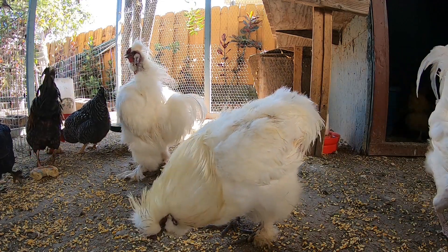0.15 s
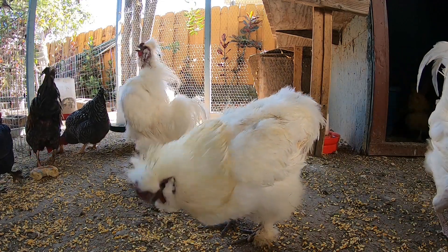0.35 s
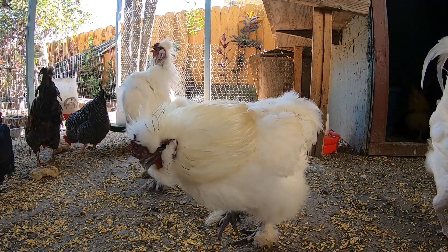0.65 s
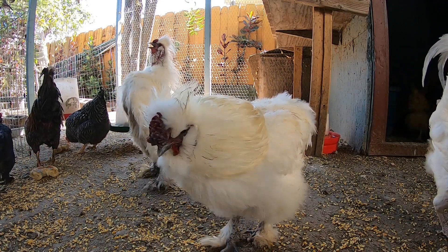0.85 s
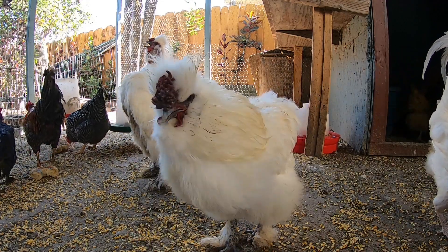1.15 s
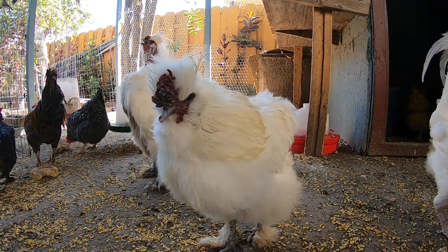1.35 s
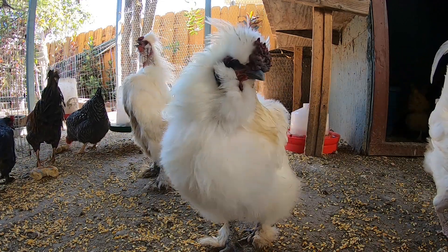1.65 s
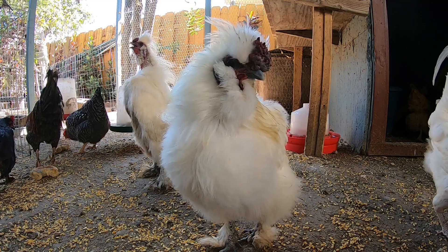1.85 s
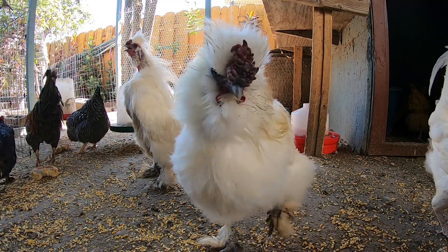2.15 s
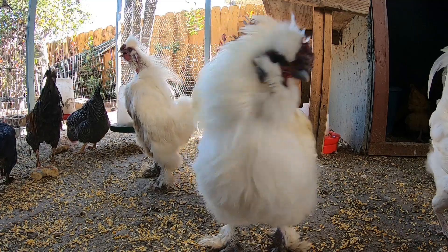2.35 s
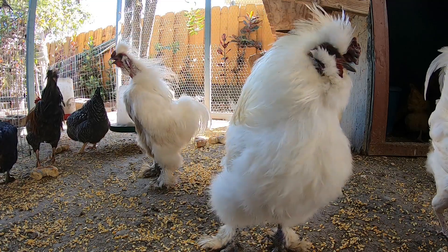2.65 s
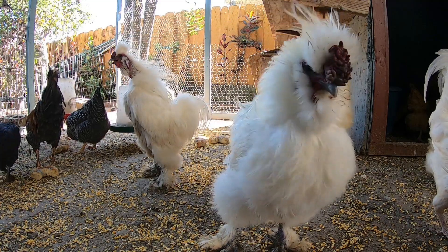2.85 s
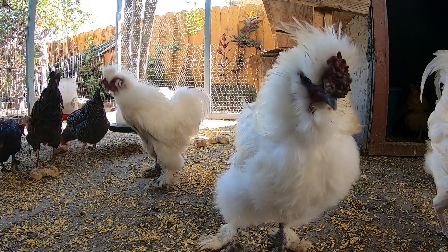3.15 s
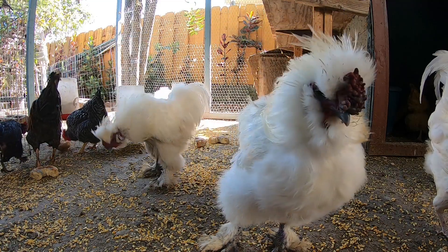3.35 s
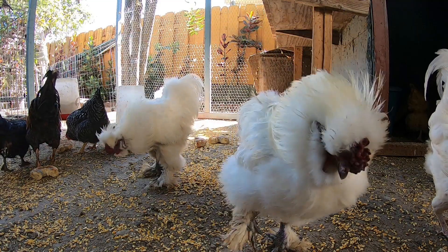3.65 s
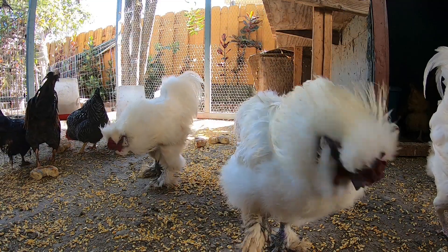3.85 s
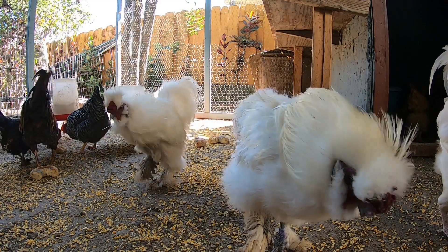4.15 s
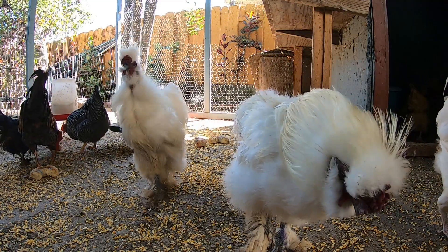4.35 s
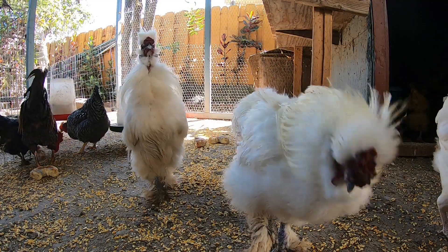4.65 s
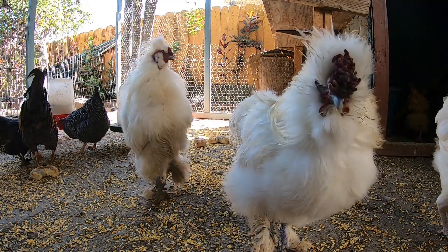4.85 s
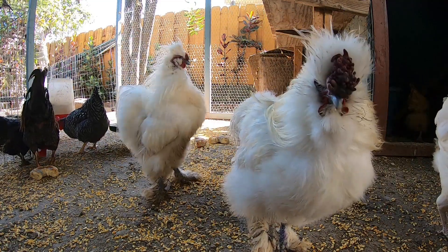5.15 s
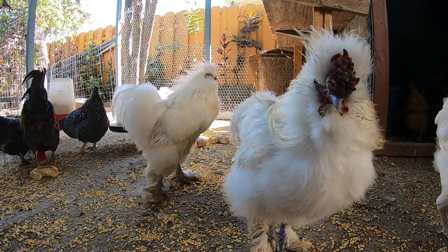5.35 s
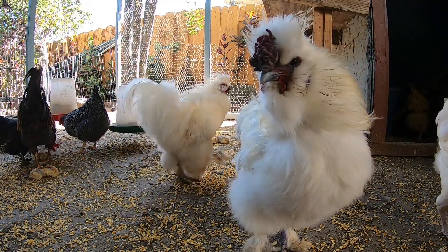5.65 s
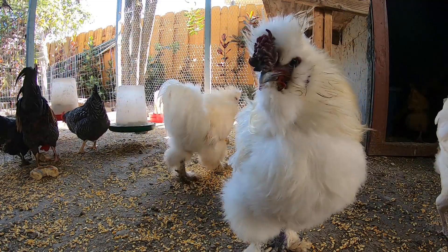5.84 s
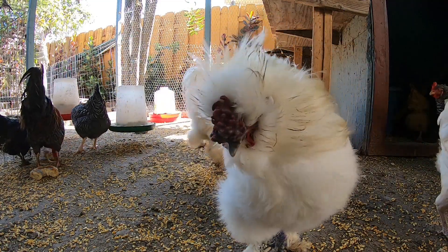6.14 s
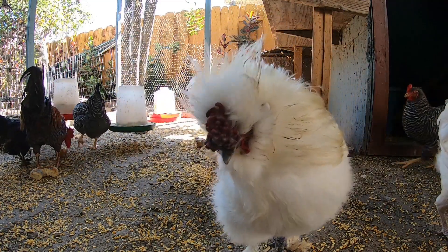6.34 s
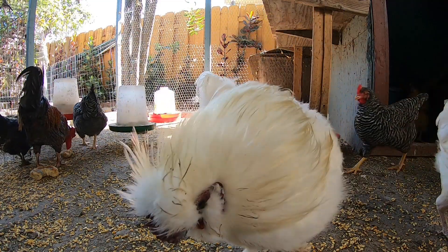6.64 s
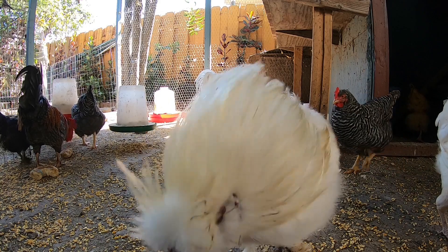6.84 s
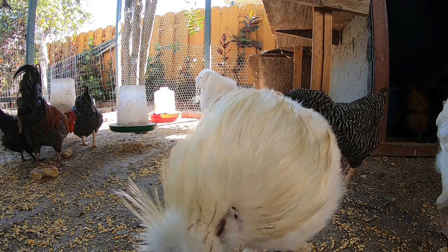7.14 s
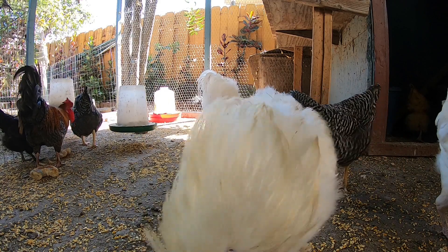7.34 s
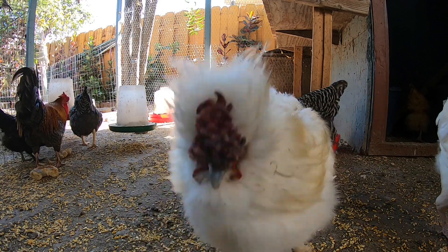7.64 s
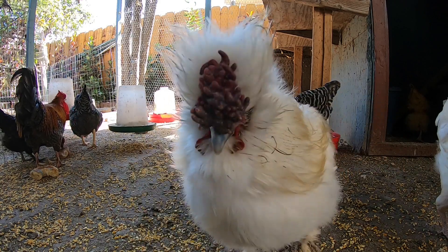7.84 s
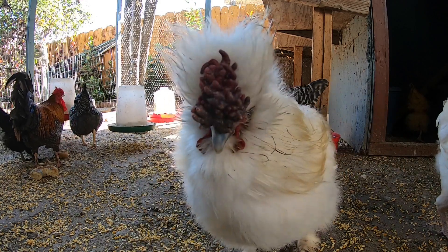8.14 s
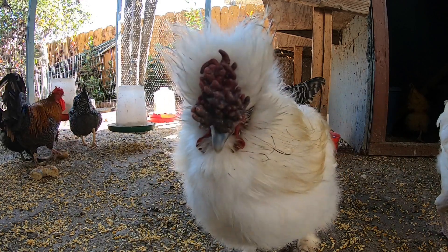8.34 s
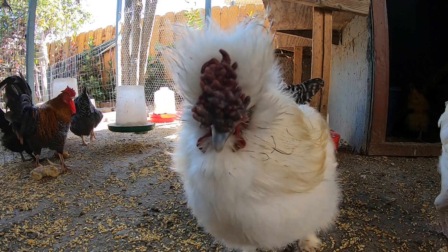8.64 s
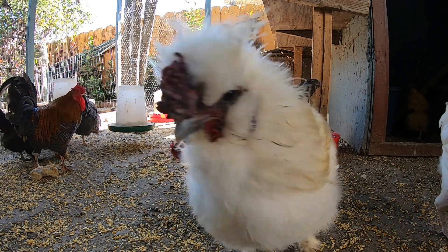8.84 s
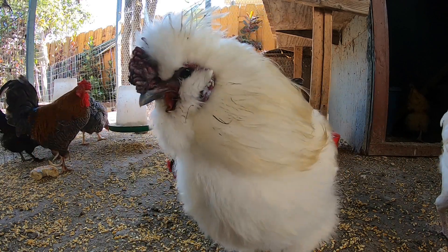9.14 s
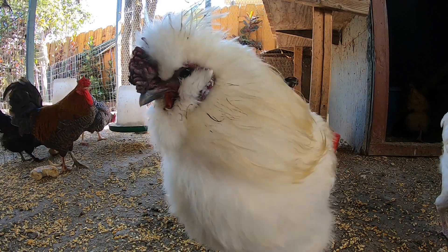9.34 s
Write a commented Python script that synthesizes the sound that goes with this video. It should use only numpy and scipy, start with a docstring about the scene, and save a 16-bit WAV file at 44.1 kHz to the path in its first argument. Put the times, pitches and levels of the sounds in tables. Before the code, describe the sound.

A rooster left of a nearby microphone barks roughly, then crows loudly once, breaking between clear tone and harsh rasp before collapsing into a hoarse low ending. Hens croon before and beneath it. Then much quieter: throaty grumbles, scattered short clucks, distant sliding bird whistles, tiny grain pecks on the right, litter rustles and soft trotting thuds over uneven low outdoor rumble. A sudden squawk begins as it ends.

```python
"""Hens croon softly over a low outdoor rumble; then a rooster on the left barks hoarsely and crows once. His
voice is built from pulses, rough noise and ringing beak tones, and breaks between clear and raspy. Hens grumble
(uneven pulses), cluck (short bursts of pulses), peck and scratch (shaped noise), a rooster runs past (dull
thuds), while a songbird whistles gliding notes, blurred by echoes. At the end the rooster starts to squawk."""
import sys
import numpy as np
from scipy import signal
from scipy.fft import rfft, irfft
from scipy.io import wavfile
from scipy.ndimage import uniform_filter1d

SR = 44100
rng = np.random.default_rng(int(sys.argv[2]) if len(sys.argv) > 2 else 0)


def int16_out(signal):
    """Quantize to a 16-bit WAV file."""
    q = np.round(np.clip(np.atleast_2d(signal).T, -1, 1) * 32767)
    wavfile.write(sys.argv[1], SR, q.astype(np.int16))


N = 418509
TIME = np.arange(N) / SR
CUTOFF_HZ = 15100   # top of the sound

# Levels in the tables are starting levels: mixing, chance and filters may still shift them.
# The rooster's voice organ in each of three calls: t/s, f/Hz, roughness/0-1
BARK = [(0.439, 801, 0.66), (0.634, 738, 1)]
CROW = [(.754, 793.8, 0.77), (0.786, 1075, 0), (0.842, 1074, 0.032), (.875, 851.8, 0.75),
        (.93, 830.9, 0.91), (.96, 837, 0.048), (1.0, 922.2, 0.67), (1.041, 930.6, 0.76),
        (1.075, 1015, 0.45), (1.16, 1075, 0), (1.308, 1038, 0.313), (1.33, 870.4, 0.62), (1.43, 836.7, 0.6),
        (1.58, 829.2, 0.5), (1.7, 915.4, 0.84), (1.93, 929, 0.57), (2.02, 921.2, 0.4), (2.2, 906.7, 0.3),
        (2.3, 906.2, 0.36), (2.365, 884.7, 0.74), (2.431, 878.2, 0.21), (2.475, 829.4, 0.49),
        (2.5, 735, 0.75), (2.601, 715.3, 0.94), (2.77, 713.3, 0.8), (2.817, 635.2, 0.97),
        (2.837, 605.7, 0.61), (2.859, 610.7, 0.58), (2.893, 569, 0.89)]
SQUAWK = [(9.456, 1208, 0.067), (9.469, 1012, 0.19), (9.469, 644, 0.26), (9.492, 775, 0.032)]
# Strain makes the voice trill and every second pulse weaken; the end values hold: t/s, strain/0-1
STRAIN = [(1.04, 0.1), (1.12, 0.86), (1.3, 0.77), (1.34, 0.42)]
# How each call is blown: throat level/dB, open-beak level/dB, attack/s, hold/s, release/(dB per s)
BLOWING = [(-25, -23.5, 0.00088, 0.086, 185), (-25, -23, 0.00059, 2.103, 291),
           (-24.5, -34.5, 0.01, .05, 250)]
# The beak gapes wider through the crow, then the neck slackens for the last syllable:
# t/s, sizzle level against the beak/dB, gape/0-1, slack/0-1, level above about 3 kHz/dB
NECK = [(.44, -26.5, 0.3, 0.03, 0.5), (.75, -22.5, 0, 0.02, 1), (1.25, -30, 0.15, 0.04, -1),
        (1.55, -24, 0.65, 0.01, -1), (2.0, -27, 1, 0, -2), (2.22, -29.5, 1, 0, -3),
        (2.43, -26.5, .8, 0.04, -2), (2.47, -31, .8, .1, -10), (2.505, -22, 0.9, 0.85, -2),
        (2.65, -20.5, 0.9, .95, -6), (2.77, -18, 0.84, 0.95, -19), (2.81, -17, 0.5, 0.94, -3.5),
        (2.845, -17.5, 0.95, 0.95, 9.5), (2.9, -11, 0.7, 1, -4), (9.45, -27, 0.99, 0.94, 5.5)]
# The rooster's throat for clear tone, rasp, slack neck and final squawk: f/Hz, relative level/dB
CLEAR_THROAT = [(350, -30.5), (650, -8), (900, 4), (1100, -0.5), (1450, 3.5), (1800, 7.5), (2130, 6.5),
                (2400, -14), (2750, 5.5), (3200, -19), (3700, 1.5), (4300, -15.5), (4800, -36.5),
                (14000, -89)]
RASP_THROAT = [(300, -28.5), (480, -17), (590, -36.5), (800, 6), (1080, -0.5), (1350, -3.5), (1650, 10),
               (2030, 3.5), (2400, -1.5), (2780, -11.5), (3000, -1), (3250, -9.5), (3500, -23.5),
               (3780, -2.5), (4050, -25), (4400, -8), (4850, -35.5), (5600, -50.5), (14000, -68)]
SLACK_THROAT = [(300, -33), (700, -1), (1000, -1), (1300, -6), (1600, -1), (1850, 6), (2100, 4.5),
                (2500, 5.5), (2750, -1.5), (3000, -18.5), (3300, -12.5), (3650, 2), (4100, -24.5),
                (4700, -52), (5200, -28.5), (5500, -31.5), (6300, -25.5), (7500, -21), (14000, -90.5)]
SQUAWK_THROAT = [(300, -19.5), (620, 0.5), (1050, -6.5), (1450, 6), (2100, 6.5), (2700, -9), (3200, -17.5),
                 (3700, -29), (4300, -20), (5300, -36), (6500, -21), (14000, -61)]
# High resonances that glide as the beak gapes and the neck slackens:
# narrow f/Hz, wide f/Hz, slack f/Hz, narrow level/dB, wide level/dB, slack level/dB, sharpness Q
BEAK_MODES = [(5350, 5150, 5350, 3.5, -4.5, -6, 12), (6280, 6860, 6300, -10, -3, 2, 7.8),
              (6980, 7780, 7400, -5, 2.5, -0.5, 10), (8240, 8860, 8850, -9.5, 3.5, -0.5, 12),
              (10100, 9900, 10000, -15.5, -4, -5, 8), (12850, 12000, 15000, -27.5, -21.5, -19, 4.9)]
# The second side of the voice organ tightens slowly: t/s, f/Hz
OTHER_SIDE = [(1.3, 662.6), (1.8, 668.8), (2.4, 705.3)]
# How much louder the rooster is in the left ear than the right: f/Hz, level difference/dB
ROOSTER_SIDE = [(380, -6.5), (780, 13), (1100, 3), (1500, 25), (2080, 0.5), (2750, 8), (3800, 3), (8000, 1)]
# Echoes from hard walls near the rooster: delay t/s, left gain, right gain
WALLS = [(.0011, 0.025, -0.3), (.0043, -0.083, -0.17), (.0097, -.08, .18)]
# Hens' drawn-out notes: t/s, length/s, start f/Hz, middle f/Hz, end f/Hz, level/dB,
# roughness/0-1, attack/s, release/s
CROONS = [(0, .17, 342.8, 362.2, 348.6, -31.5, 0.16, 0.075, 0.15),
          (.25, 0.15, 321.5, 354.5, 353, -35.5, 0.2, 0.036, 0.047),
          (.52, 0.16, 359.3, 368.4, 360.5, -39, .19, 0.02, 0.12),
          (.82, 0.16, 325.6, 344.3, 346, -41.5, 0, 0.098, 0.062)]
GRUMBLES = [(3.462, 0.041, 306, 311, 300, -49, 0.2, 0.022, .015),
            (3.515, 0.22, 267, 277.7, 262.6, -49.5, 0.68, 0.028, 0.01),
            (3.765, 0.18, 266.2, 275.5, 289, -47.5, 0.817, 0.056, 0.021),
            (3.91, 0.15, 283.6, 309, 321.6, -47.5, 0.28, 0.015, 0.022),
            (6.28, 0.19, 264.2, 277.4, 258, -48, 0.36, 0.0067, 0.02),
            (6.46, 0.23, 259.8, 301.3, 318.5, -47, 0.84, 0.0044, 0.03),
            (6.71, 0.105, 288, 270.2, 257, -54, .8, 0.011, 0.044),
            (8.28, 0.263, 234.8, 211.2, 230.7, -50.5, 0.99, 0.05, 0.057)]
# Tone colour of the hens' throats: f/Hz, relative level/dB
CROON_THROAT = [(200, -6), (360, -18.5), (720, -4.5), (1080, -4.5), (1430, -9.5), (1800, -20), (2400, -30),
                (3200, -20.5), (4400, -31), (5000, -39.5), (5700, -23.5), (6700, -43.5), (7800, -31),
                (12000, -65)]
GRUMBLE_THROAT = [(150, -9), (300, 2), (410, -1), (590, 7.5), (780, -2), (1080, -2), (1380, -8.5),
                  (1560, -5), (2200, -22), (4000, -29.5), (9000, -45)]
# A hen's mouth resonance rises as her beak opens: t/s, f/Hz
HEN_MOUTH = [(3.5, 1150), (3.6, 1030), (3.7, 1120), (3.79, 950), (4.05, 1320), (6.3, 1180), (6.5, 990),
             (6.68, 1400), (6.78, 850)]
# Clucks: t/s, length/s, pitch f/Hz, level/dB, brightness f/Hz
CLUCKS = [(3.338, 0.026, 270, -44.5, 1920), (4.29, 0.034, 323, -42.5, 704),
          (4.442, 0.045, 294, -42.5, 1660), (4.529, 0.052, 304, -43, 1140), (4.61, 0.083, 265, -51.5, 1080),
          (5.07, 0.043, 215, -47.5, 1340), (5.451, 0.023, 329, -42.5, 1550),
          (5.602, 0.04, 344.7, -36, 1270), (5.662, 0.025, 336.5, -39.5, 1370),
          (5.725, 0.06, 350, -38, 1400), (5.815, 0.019, 337, -34, 1250), (6.037, 0.029, 293, -41, 1100),
          (6.146, 0.02, 356, -41, 1770), (6.169, 0.038, 785, -45.5, 2370), (6.199, 0.037, 412, -46.5, 1890),
          (6.279, 0.043, 262.6, -39, 1120), (6.845, 0.024, 808, -42.5, 2070),
          (6.893, 0.046, 262, -42.5, 1220), (7.227, 0.028, 438.7, -29.5, 1140),
          (7.668, 0.033, 419.6, -35.5, 1190), (8.063, 0.027, 448, -33.5, 1970),
          (8.901, 0.029, 454, -31.5, 1950), (9.371, 0.03, 365.7, -34.5, 1380)]
# Tone colour of a cluck: f/Hz, relative level/dB
CLUCK_THROAT = [(120, -3), (330, 6.5), (600, 4.5), (900, 1), (1400, 1.5), (2200, 0), (3100, 6.5), (4500, 5),
                (6000, -5), (12000, -25)]
# Songbird syllables: t/s, length/s, pitch f/Hz, sweep/octaves,
# bow of both ends below a straight glide/octaves, level/dB
SONG = [(2.937, 0.079, 3964, -0.18, .17, -49), (3.145, 0.079, 4020, -0.22, 0.095, -46.5),
        (3.29, 0.039, 3550, 0.35, 0.032, -38), (3.419, 0.065, 3845, -0.35, 0.0062, -39),
        (3.465, 0.032, 4540, -0.21, .03, -51), (3.568, 0.073, 3930, -0.34, 0.12, -35.5),
        (3.721, 0.038, 3500, -0.21, 0.0076, -42.5), (3.747, 0.048, 4160, -0.29, -0.04, -43),
        (3.846, 0.067, 3580, -0.52, -0.049, -35), (3.923, 0.044, 3590, -0.45, 0, -37),
        (4.021, 0.079, 2755, -0.38, -0.023, -39), (4.154, 0.041, 2786, -0.56, 0.035, -35),
        (4.28, 0.048, 2730, -0.54, 0.027, -36), (4.395, 0.036, 3610, 0.22, 0.00075, -42),
        (4.429, 0.072, 3636, -0.63, 0.12, -33), (4.662, 0.051, 4295, 0.024, 0, -37.5),
        (4.699, 0.035, 4075, -0.39, .07, -34), (4.838, 0.062, 5340, -0.47, 0.15, -43.5),
        (4.954, 0.054, 4315, -0.48, 0.084, -39.5), (5.079, 0.105, 3354, 0.6, 0.113, -37.5),
        (5.295, 0.073, 5080, -0.58, 0.1, -46), (5.44, 0.056, 3880, -0.67, 0.12, -40),
        (5.575, 0.059, 3565, -0.54, 0.12, -44), (5.65, 0.06, 3040, -0.8, 0.11, -39),
        (5.795, 0.052, 3790, -0.038, 0.054, -36.5), (5.815, 0.016, 4500, 0.54, 0.1, -35),
        (5.89, 0.072, 3387, -0.8, .14, -37.5), (5.973, 0.069, 2996, -0.18, .03, -36),
        (6.145, 0.37, 3990, -0.2, 0.037, -66.5)]
# The song comes back from house and fence: delay t/s, gain
SONG_ECHOES = [(.016, 0.33), (.034, 0.22), (.062, .14)]
# A beak on grain: t/s, level/dB, ring f/Hz
PECKS = [(3.643, -46, 4280), (4.0894, -36.5, 2660), (5.439, -37.5, 4200), (6.284, -55, 4040),
         (7.136, -46, 1940), (7.714, -39, 2630), (8.579, -44, 2320), (9.149, -48, 1690)]
# A bird trots over packed earth: t/s, level/dB
FOOTFALLS = [(3.347, -41.5), (4.301, -38.5), (4.45, -35.5), (4.529, -32.5), (4.653, -34), (5.075, -32.5),
             (5.73, -29.5), (8.077, -32), (8.388, -29), (8.915, -35)]
# Tone colour of one footfall: f/Hz, relative level/dB
THUD = [(50, -6.5), (110, -8), (165, 19.5), (240, -2.5), (380, -2.5), (700, -37), (2000, -75)]
# Feet and feathers in the litter: t/s, level/dB
SCRATCH = [(3.0, -93), (3.69, -72.5), (4.12, -78.5), (5.3, -75), (6.27, -67.5), (6.64, -86), (7.26, -74.5),
           (9.4, -82.5)]
# A foot drags through the litter: t/s, length/s, level/dB
SCUFFS = [(3.224, 0.06, -70.5), (3.64, 0.025, -68), (3.718, 0.058, -76), (6.042, 0.13, -63.5),
          (7.276, 0.22, -80.5), (8.33, 0.22, -80)]
# Tone colour of the litter: f/Hz, relative level/dB
LITTER = [(300, -7.5), (900, 4), (2500, -2), (4200, -6.5), (5500, -11.5), (8500, -8.5), (10500, -23.5),
          (12000, -29.5), (15000, -35.5)]
# Outdoor rumble over time: t/s, deep level/dB, low level/dB
RUMBLE = [(0.0, -48, -53), (0.5, -48.5, -55), (1.32, -62, -65), (3.67, -52.5, -54.5), (4.28, -67, -55),
          (4.68, -46.5, -45), (4.84, -57, -55), (5.05, -45, -48.5), (6.84, -56, -52), (8.38, -46, -41.5),
          (9.49, -50.5, -50)]
# Tone colour of deep rumble, low rumble and air: f/Hz, relative level/dB
DEEP_COLOUR = [(12, -23.5), (30, -12.5), (55, 1.5), (100, -5.0), (150, -35.0), (400, -67.5)]
LOW_COLOUR = [(60, -27.5), (120, 3.5), (180, 3.0), (260, -9.0), (450, -14), (1500, -60.5)]
AIR = [(120, -17), (300, -3), (800, -6.5), (1600, -15), (2500, -27), (4200, -26.5), (5500, -25),
       (9000, -25.5), (12000, -44)]

# The rooster's breath: the first push is the hardest, then throat and beak drift apart
ACCENT_DB, ACCENT_S = 2.5, 0.095
THROAT_SAG_DB_PER_S, BEAK_SAG_DB_PER_S = 1, -0.13   # the negative sag is a slight rise
MIDDLE_HZ, BEAK_DB_PER_OCTAVE = 940, 11   # higher notes are brighter
SLACK_THROAT_DB = 1.5   # a slack neck lets the low tones out
# A rough voice cannot hold its pitch or brightness (sizes at full roughness)
WAVER, WAVER_PER_S = 0.0119, 20   # share of the pitch, changes per s
FLUTTER_DB, FLUTTER_PER_S = 1, 28
# A half-rough voice keeps catching and breaking
BREAKING, BREAKS_PER_S = 0.19, 55   # swing of the roughness, changes per s
DOUBLING = 0.88   # typical weakening of every second pulse at full roughness, as a share
SHIMMER_DB, SHIMMER_PER_S = 3, 55   # each partial swells and fades on its own
SLACK_LAG, SLACK_WAVER = .06, 0.0251   # slack neck: second side lower and unsteadier, shares of pitch
# The head never holds still: share of each resonance, its level, changes per s
BEAK_WANDER, BEAK_WANDER_DB, BEAK_WANDER_PER_S = 0.0059, 3, 5.97
MOUTH_WANDER, MOUTH_WANDER_PER_S = 0.04, 20   # a hen's mouth: share, changes per s
# A cluck's mouth resonance peaks at this share of the brightness, from so far below
CLUCK_MOUTH_SHARE, CLUCK_MOUTH_OCTAVES = 0.72, 1
YARD_T60_S = 0.32   # time for the tail of the yard's echo to fall by 60 dB
HUM_HZ, HUM_MAX_DB, AIR_DB = 171, -53, -63


def rooster():
    """Three calls, heard more on the left, with wall echoes and the sound of the yard."""
    out = np.zeros(N)
    slack_throats = (SLACK_THROAT, SLACK_THROAT, SQUAWK_THROAT)
    for call, blowing, slack_throat in zip((BARK, CROW, SQUAWK), BLOWING, slack_throats):
        add(out, *rooster_call(call, blowing, slack_throat))
    side_db = at_hz(ROOSTER_SIDE, np.arange(N // 2 + 1) * SR / N)
    ears = from_db([side_db / 2, -side_db / 2])
    direct = irfft(rfft(out) * ears / ears.mean(axis=0), N)
    echoes = sum(delayed(out, delay) * np.array([[left], [right]]) for delay, left, right in WALLS)
    return from_db(1.0) * (direct + echoes) + yard(out, wet_db=-18.5, early_db=-2.5)


def rooster_call(call, blowing, slack_throat, second_waver=.017, trill_hz=31, trill_depth=0.048,
                 jitter=0.0518, rasp_db=-1, hiss_db=-6, rattle_db=2.3):
    """One side of the voice organ carries the pitch; roughness brings in the other side and hissing air."""
    t = span(call[0][0], call[-1][0])
    size = len(t)
    hz, rough = at_time(call, t)
    strain, = at_time(STRAIN, t)
    sizzle_db, gape, slack, treble_db = at_time(NECK, t)
    rough = rough + BREAKING * 2 * rough * (1 - rough) * wobble(BREAKS_PER_S, size)
    rough, gape, slack = np.clip([rough, gape, slack], 0, 1)

    throat_db, beak_db = effort(t - t[0], hz, slack, blowing)
    beak_db = beak_db + FLUTTER_DB * rough * wobble(FLUTTER_PER_S, size)
    trill = np.cos(2 * np.pi * trill_hz * (t - STRAIN[1][0] - .008))
    hz = hz * (1 + trill_depth * strain * trill)
    hz = hz * (1 + WAVER * rough * wobble(WAVER_PER_S, size))

    halving = 0.32 * strain + DOUBLING * rough * wobble(BREAKS_PER_S, size)
    lead = rms_one(pulses(hz, jitter * rough + 0.0026, halving, SHIMMER_DB * np.sqrt(rough)))
    other_hz = (1 - slack) * at_time(OTHER_SIDE, t)[0] + slack * hz * (1 - SLACK_LAG)
    other_hz = other_hz * (1 + (second_waver + SLACK_WAVER * slack) * wobble(30, size))
    second = rms_one(pulses(other_hz, 0.031, shimmer_db=SHIMMER_DB))
    rattle = from_db(rattle_db * wobble(140, size))   # the membranes catch and let go unevenly
    rasp = (second + from_db(hiss_db) * rng.standard_normal(size)) * rattle

    tone = (1 - slack) * colour(lead, CLEAR_THROAT) + slack * colour(lead, slack_throat)
    hoarse = (1 - slack) * colour(rasp, RASP_THROAT) + slack * colour(rasp, slack_throat)
    voice = (1 - 0.69 * rough) * even(tone) + from_db(rasp_db) * rough * hoarse
    throat = from_db(throat_db) * even(band(voice, 1550, "low", order=6))
    beak = from_db(beak_db) * even(band(voice, 1924, "high", order=6))
    treble = from_db(treble_db) * band(beak, 3267, "high", order=5)
    beak = band(beak, 3060, "low", order=5) + treble
    sizzle = from_db(beak_db + sizzle_db) * even(beak_ring(lead + rough * rasp, gape, slack))
    return t, (throat + beak + sizzle) * gate(t, blowing[2], 0.0015)


def effort(age, hz, slack, blowing):
    """Throat and beak levels in dB: an accent, a slow drift and the release; the beak follows pitch."""
    throat_db, beak_db, _, hold, release_rate = blowing
    push_db = ACCENT_DB * np.exp(-(age / ACCENT_S) ** 2) - release_rate * np.maximum(age - hold, 0)
    throat_db = throat_db + push_db - THROAT_SAG_DB_PER_S * age + SLACK_THROAT_DB * slack
    beak_db = beak_db + push_db - BEAK_SAG_DB_PER_S * age
    return throat_db, beak_db + BEAK_DB_PER_OCTAVE * np.log2(hz / MIDDLE_HZ)


def beak_ring(x, gape, slack, lowest_hz=5100, size=256):
    """Sharp high resonances with deep gaps between them, gliding with the beak and the neck."""
    out = np.zeros(len(x))
    posture = np.array([(1 - slack) * (1 - gape), (1 - slack) * gape, slack])   # narrow, wide, slack
    for *shape, q in BEAK_MODES:
        hz, level_db = np.reshape(shape, (2, -1)) @ posture
        hz = hz * (1 + BEAK_WANDER * wobble(BEAK_WANDER_PER_S, len(x)))
        level_db = level_db + BEAK_WANDER_DB * wobble(BEAK_WANDER_PER_S, len(x))
        ring = mouth(mouth(x, hz, q, size), hz, q, size)   # twice, for deeper gaps
        out += from_db(level_db) * ring
    return band(out, lowest_hz, "high", order=10)


def hens():
    """Crooning and grumbling voices, placed right of the middle."""
    croon = hen_notes(CROONS, CROON_THROAT, jitter=0.07, breathiness=.35, mouth_gain=.1)
    grumble = hen_notes(GRUMBLES, GRUMBLE_THROAT, jitter=0.0652, breathiness=1.0, mouth_gain=2.6)
    direct = pan(from_db(4.5) * croon, -4.5) + pan(from_db(1.5) * grumble, -8.5)
    return direct + yard(croon + grumble, wet_db=-8.0, early_db=2.0)


def hen_notes(calls, throat, jitter, breathiness, mouth_gain, grain_db=3.0):
    """Long notes through a nearly closed beak; slow, uneven pulses make them waver and grumble."""
    out = np.zeros(N)
    for start, length, first_hz, middle_hz, last_hz, level_db, rough, attack, release in calls:
        t = span(start, start + length)
        size = len(t)
        curve = np.polyfit([0, .5, 1], [first_hz, middle_hz, last_hz], 2)
        hz = np.polyval(curve, np.linspace(0, 1, size))
        hz = hz * (1 + .065 * rough * wobble(35, size))
        mouth_hz = at_time(HEN_MOUTH, t)[0] * (1 + MOUTH_WANDER * wobble(MOUTH_WANDER_PER_S, size))
        buzz = rms_one(pulses(hz, jitter * rough, shimmer_db=SHIMMER_DB * rough, order=32))
        source = buzz + breathiness * (0.39 + rough) * rng.standard_normal(size)
        voice = even(colour(source + mouth_gain * mouth(source, mouth_hz, 6.4), throat))
        level = from_db(level_db + grain_db * rough * wobble(60, size))
        add(out, t, level * voice * gate(t, attack, release))
    return out


def clucks(arch=0.275, fall=0.1, jitter=0.046, breathiness=0.92, mouth_gain=1.0, swell=1.372):
    """Short runs of pulses swell and fade; pitch and mouth resonance rise and drop with the push of air."""
    out = np.zeros(N)
    for start, length, hz, level_db, bright_hz in CLUCKS:
        t = span(start, start + length)
        progress = np.linspace(0, 1, len(t))
        push = np.sin(np.pi * progress ** swell)
        rough = min(1, (460 / hz) ** 3)   # a high cluck rings clear
        pitch = hz * (1 + arch * rough * (push - .7) - fall * (progress - .5))
        buzz = rms_one(pulses(pitch, jitter * rough, order=28))
        source = buzz + breathiness * rough * rng.standard_normal(len(t))
        mouth_hz = CLUCK_MOUTH_SHARE * bright_hz * 2 ** (CLUCK_MOUTH_OCTAVES * (push - 1))
        source = source + mouth_gain * mouth(source, mouth_hz, 9.8)
        muffled = band(source, bright_hz, "low", order=5) + 0.015 * band(source, 6300, "low", order=2)
        add(out, t, from_db(level_db) * colour(muffled, CLUCK_THROAT) * np.abs(push) ** 0.27)
    return pan(out, -1.7) + yard(out, wet_db=-14, early_db=-3.5)


def songbird(warble=0.0243, echo_width=0.51, direct=0.62):
    """Nearly pure glides from beyond the fence, heard mostly by their echoes."""
    out = np.zeros(N)
    for start, length, pitch_hz, sweep, bow, level_db in SONG:
        t = span(start, start + length)
        u = np.linspace(-1, 1, len(t))
        glide_hz = pitch_hz * 2 ** (sweep * u / 2 - bow * u ** 2)
        hz = glide_hz * (1 + warble * np.sqrt(2 * abs(sweep)) * wobble(416.0, len(t)))
        whistle = np.sin(2 * np.pi * np.cumsum(hz) / SR)
        level = from_db(level_db + 2.36 * wobble(104.5, len(t)))
        add(out, t, level * whistle * gate(t, 0.012, 0.0095))
    echoed = direct * out + sum(gain * delayed(out, delay) for delay, gain in SONG_ECHOES)
    heard = echoed + yard(out, wet_db=-2.0, early_db=-0.5)
    middle = heard.mean(axis=0)
    return middle + echo_width * (heard - middle)   # narrower in stereo


def pecks():
    """A beak snaps a grain: a sharp tick of noise with a short ring, far to the right."""
    out = np.zeros(N)
    for start, level_db, ring_hz in PECKS:
        t = span(start, start + 0.034)
        age = t - t[0]
        tick = band(rng.standard_normal(len(t)), 1600, "high", order=2) * np.exp(-age / 0.0016)
        ring = np.sin(2 * np.pi * ring_hz * age) * np.exp(-age / 0.0011)
        add(out, t, from_db(level_db) * (.5 * band(tick, 7100, "low", order=3) + 0.58 * ring))
    return pan(out, -31.5) + yard(out, wet_db=1.0, early_db=9.0)


def footfalls(attack_s=0.0023, decay_s=0.018):
    """Each step is a dull, quickly damped thud in the ground."""
    out = np.zeros(N)
    for start, level_db in FOOTFALLS:
        t = span(start, start + .12)
        thud = even(colour(rng.standard_normal(len(t)), THUD))
        damping = np.exp(-(t - t[0]) / decay_s)
        add(out, t, from_db(level_db) * thud * damping * gate(t, attack_s, .02))
    return out


def scratching(grains_per_s=220, level_db=8):
    """Feet and feathers stir loose grain: clumps of tiny clicks on a rustle; a dragging foot adds swish."""
    stir_db, = at_time(SCRATCH, TIME)
    drag = np.zeros(N)
    for start, length, scuff_db in SCUFFS:
        t = span(start, start + length)
        add(drag, t, from_db(scuff_db) * np.sin(np.linspace(0, np.pi, len(t))))
    born = rng.random(N) < grains_per_s * from_db(7 * wobble(14, N)) / SR   # the rate comes in clumps
    grain_size = from_db(6 * np.minimum(rng.exponential(1, N), 3))
    grains = rms_one(born * rng.choice([-1, 1], N) * grain_size)
    swish = rms_one(rng.standard_normal(N) * from_db(4 * wobble(30, N) + 4 * wobble(300, N)))
    stirred = colour(grains + 0.36 * swish, LITTER) * from_db(stir_db)
    dragged = colour(swish, LITTER) * drag
    rustle = from_db(level_db) * (stirred + dragged)
    return pan(rustle, -11.0) + yard(rustle, wet_db=-6.5, early_db=9.0)


def outdoors():
    """Low noise rumble alike in both ears, a faint wavering hum and a thin, wide wash of air."""
    deep_db, low_db = at_time(RUMBLE, TIME)
    deep = from_db(deep_db - 2.0) * colour(rng.standard_normal(N), DEEP_COLOUR)
    low = from_db(low_db - 2.0) * colour(rng.standard_normal(N), LOW_COLOUR)
    hum_hz = HUM_HZ * (1 + 0.0151 * wobble(12, N))
    hum_db = np.minimum(HUM_MAX_DB, low_db - 0.5) + 3.2 * wobble(9.5, N)
    hum = from_db(hum_db) * np.sin(2 * np.pi * np.cumsum(hum_hz) / SR)
    middle, side = (colour(rng.standard_normal(N), AIR) for _ in range(2))
    width = 1.3 * band(side, 592.6, "high", order=2) * np.array([[1], [-1]])   # opposite in each ear
    return deep + low + hum + from_db(AIR_DB) * (middle + width)


def yard(x, wet_db, early_db):
    """Scatter from coop and posts, then a duller tail from the fences; the bass is alike in both ears."""
    t = span(0, .6)
    left, right = rng.standard_normal((2, len(t)))
    mixed = band(left, 680, "low", order=1) + band(right, 370, "high", order=1)
    noise = np.array([left, mixed])
    early = noise * from_db(-60 * t / 0.072) * (t > .003)
    tail = band(noise, 3900, "low", order=1) * from_db(-60 * t / YARD_T60_S) * (t > .018)
    response = from_db(early_db) * rms_one(early) + from_db(wet_db) * rms_one(tail)
    response = response / np.sqrt(len(t))
    return signal.fftconvolve(x[None], response, axes=1)[:, :N]


def pulses(hz, jitter, halving=0, shimmer_db=0, order=20):
    """Membrane pulses whose period and strength change by chance from cycle to cycle."""
    size = len(hz)
    cycle_rate = np.mean(hz)
    phase = 2 * np.pi * np.cumsum(hz * (1 + jitter * wobble(cycle_rate, size))) / SR
    train = np.zeros(size)
    for k in range(1, order + 1):
        partial = np.cos(k * phase) * (k * hz < CUTOFF_HZ)
        train += partial * from_db(shimmer_db * wobble(SHIMMER_PER_S, size))
    # half the pitch in the strength makes strong and weak pulses alternate
    return train * (1 + halving * np.cos(phase / 2) + 17.9 * jitter * wobble(cycle_rate, size))


def mouth(x, hz, q, size=64):
    """A resonance whose centre moves, stepped block by block; gain about 1 at its peak."""
    out, state = np.zeros(len(x)), np.zeros(2)
    for i in range(0, len(x), size):
        angle = 2 * np.pi * hz[i] / SR
        r = np.exp(-angle / (2 * q))
        top = (1 - r * r) / 2 * np.array([1, 0, -1])
        bottom = [1, -2 * r * np.cos(angle), r * r]
        out[i:i + size], state = signal.lfilter(top, bottom, x[i:i + size], zi=state)
    return out


def colour(x, spectrum, size=2048):
    """Filter to a given spectrum without ringing ahead of the sound (minimum phase); rms 1."""
    gains = from_db(at_hz(spectrum, np.arange(size + 1) * SR / (2 * size)))
    cepstrum = irfft(np.log(gains))
    cepstrum[1:size] *= 2
    cepstrum[size + 1:] = 0
    response = irfft(np.exp(rfft(cepstrum)))[:size]
    return rms_one(signal.fftconvolve(x, response)[:len(x)])


def band(x, hz, kind, order=4):
    """Butterworth filter: keep what lies below ("low") or above ("high") a frequency."""
    sos = signal.butter(order, np.clip(hz, 10, SR * .45), kind, fs=SR, output="sos")
    return signal.sosfilt(sos, x)


def even(x):
    """Hold the level steady over 20 ms windows, so that the bird's effort can set it."""
    return x / np.sqrt(np.abs(uniform_filter1d(x ** 2, SR // 50)) + 1e-12)


def wobble(rate, size):
    """Smooth chance with about `rate` new values a second."""
    x = np.arange(size) * rate / SR
    count = int(x[-1]) + 2
    return np.interp(x, np.arange(count), rng.standard_normal(count))


def at_time(rows, t):
    """Each column of a curve at the times t; the end values hold outside it."""
    s, *columns = np.transpose(rows)
    return [np.interp(t, s, c) for c in columns]


def at_hz(points, hz):
    """A spectrum read on a log-frequency axis."""
    f, value = np.transpose(points)
    return np.interp(np.log(np.maximum(hz, 1)), np.log(f), value)


def from_db(db):
    """Decibels to gain."""
    return 10 ** (np.asarray(db) / 20)


def rms_one(x):
    """Scale to unit rms, a measure of average strength."""
    return x / np.sqrt(np.mean(x ** 2) + 1e-20)


def span(start, end):
    """Sample times between two moments in s."""
    return TIME[max(int(start * SR), 0):int(end * SR)]


def gate(t, attack, release):
    """Fade a sound in and out; both times in s."""
    return np.clip((t - t[0]) / attack, 0, 1) * np.clip((t[-1] - t) / release, 0, 1)


def delayed(x, delay):
    """The same sound arriving later by the delay in s."""
    return np.interp(TIME - delay, TIME, x, left=0)


def add(track, t, x):
    """Mix a sound into a track at its own times."""
    first = int(round(t[0] * SR))
    track[first:first + len(x)] += x[:N - first]


def pan(x, db):
    """Place a sound between the ears; positive is left."""
    return x * from_db([[db / 2], [-db / 2]])


def scene():
    """All the birds and the yard around them."""
    voices = rooster() + hens() + clucks() + songbird()
    return voices + pecks() + footfalls() + scratching() + outdoors()


def record(dry):
    """The top is cut steeply."""
    return signal.sosfilt(signal.cheby2(16, 70, CUTOFF_HZ, fs=SR, output="sos"), dry)


dry = scene()
out = record(dry)
int16_out(out)
```